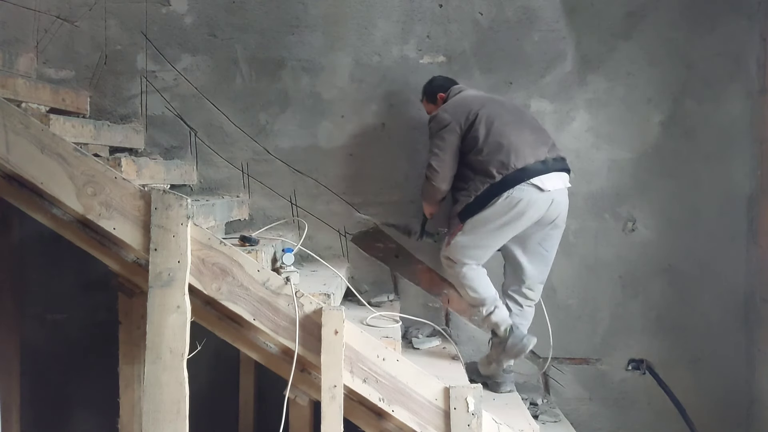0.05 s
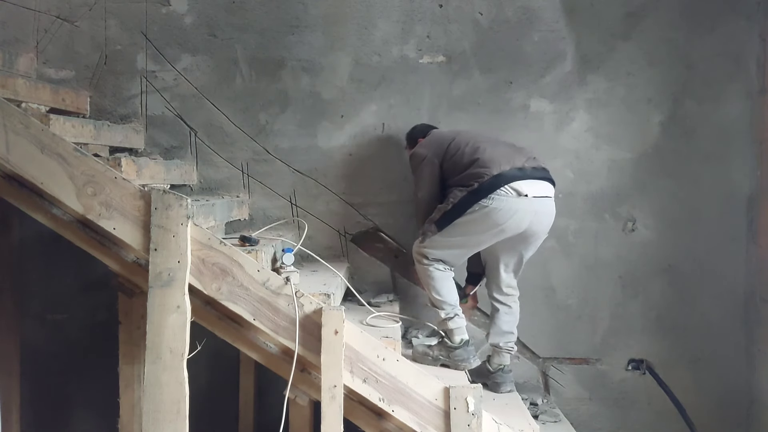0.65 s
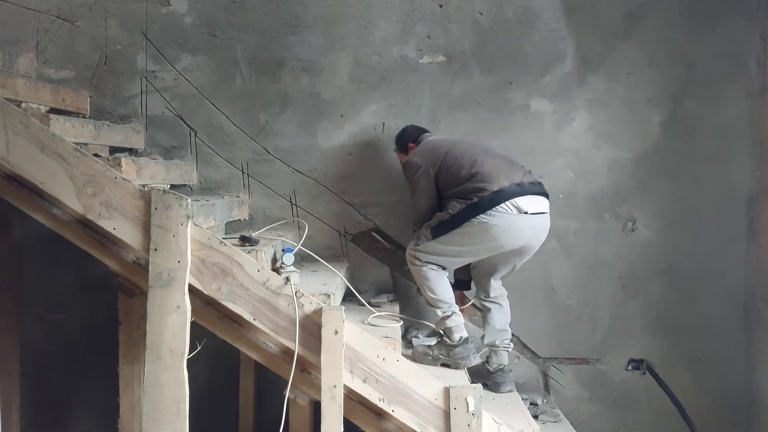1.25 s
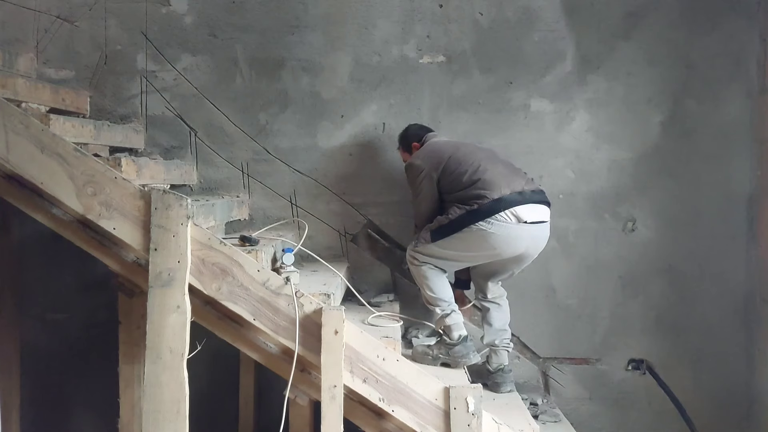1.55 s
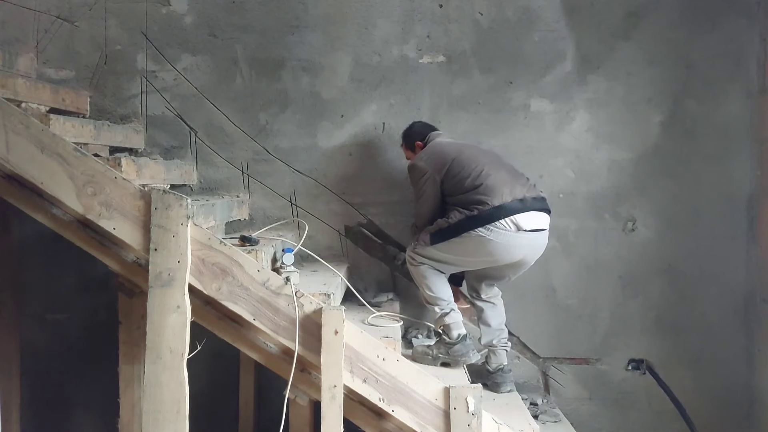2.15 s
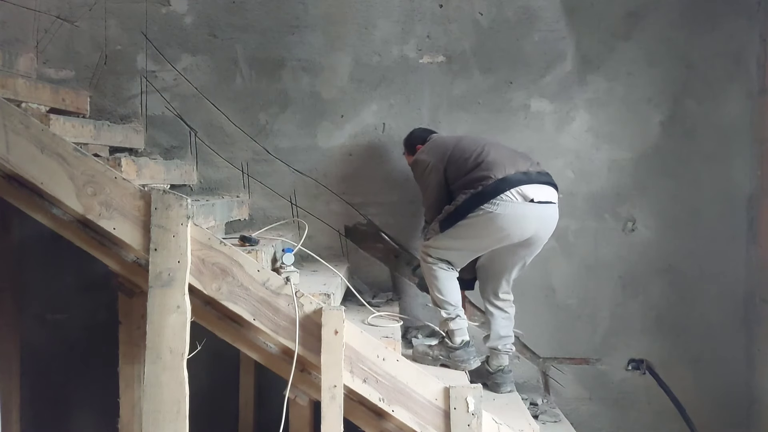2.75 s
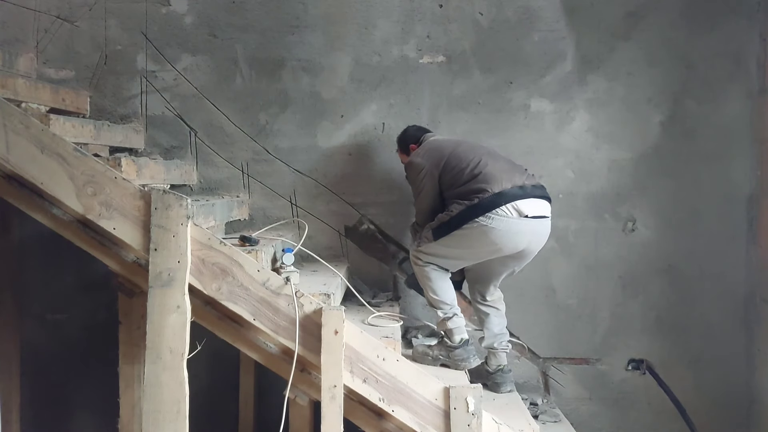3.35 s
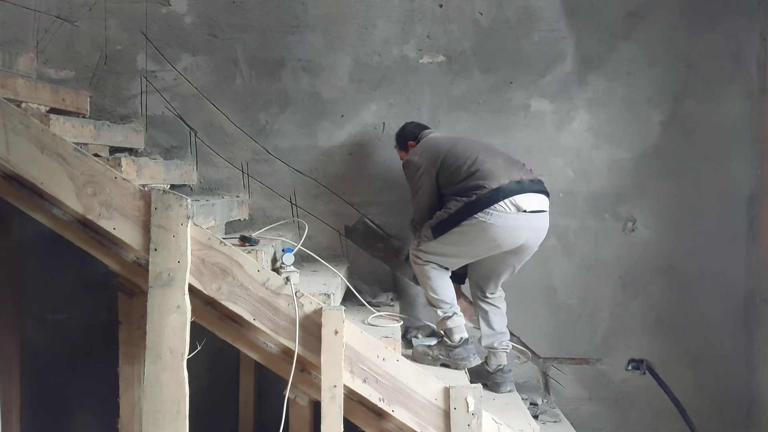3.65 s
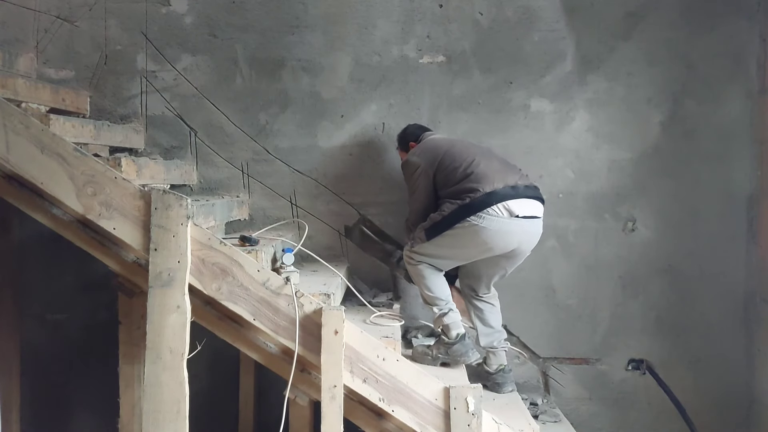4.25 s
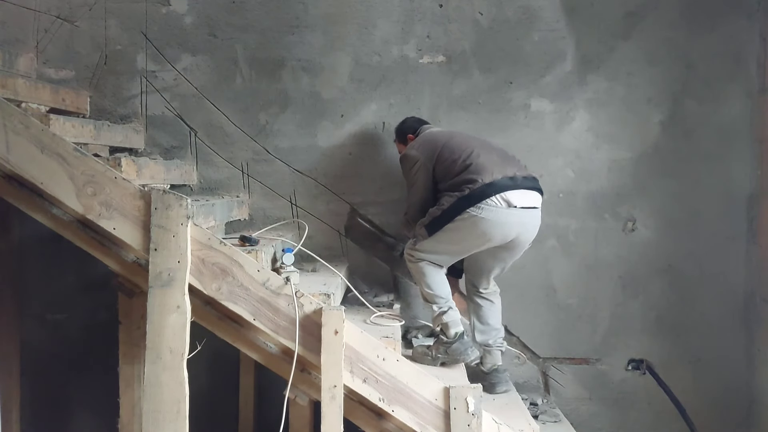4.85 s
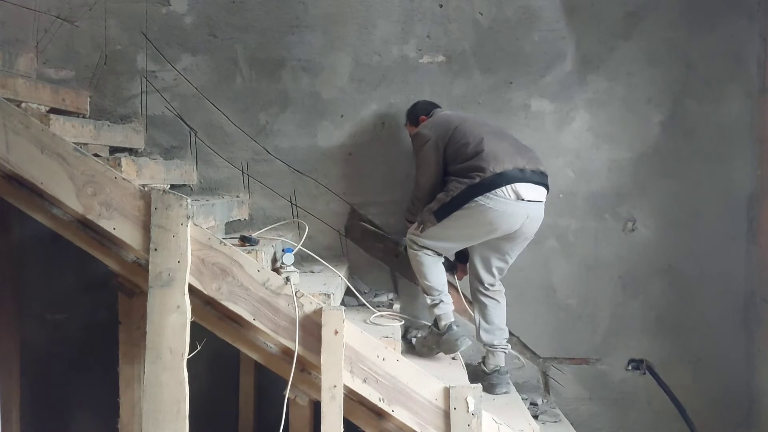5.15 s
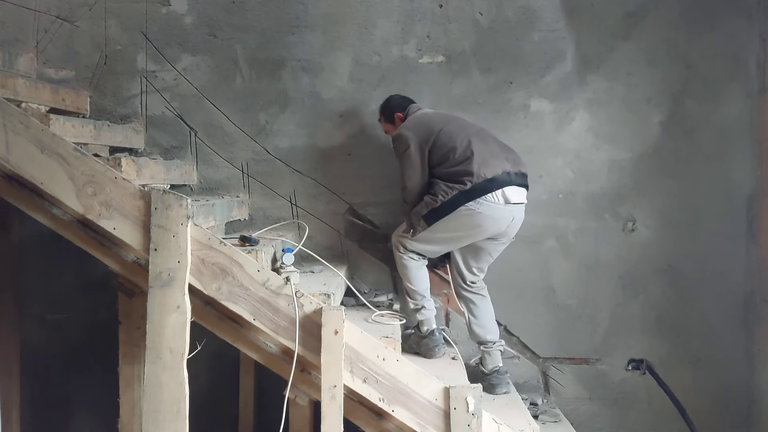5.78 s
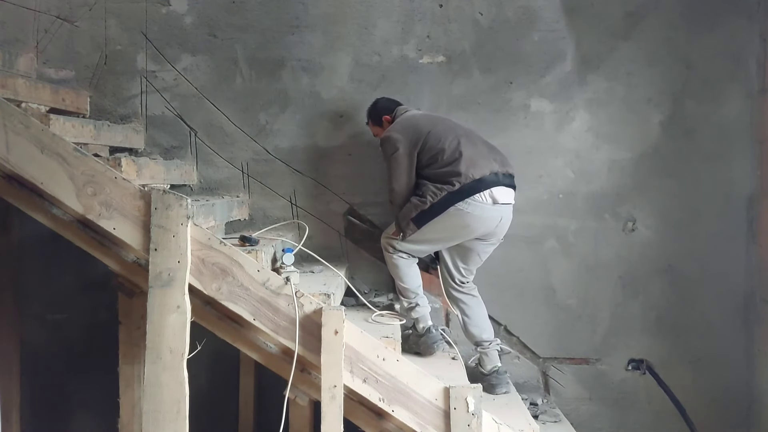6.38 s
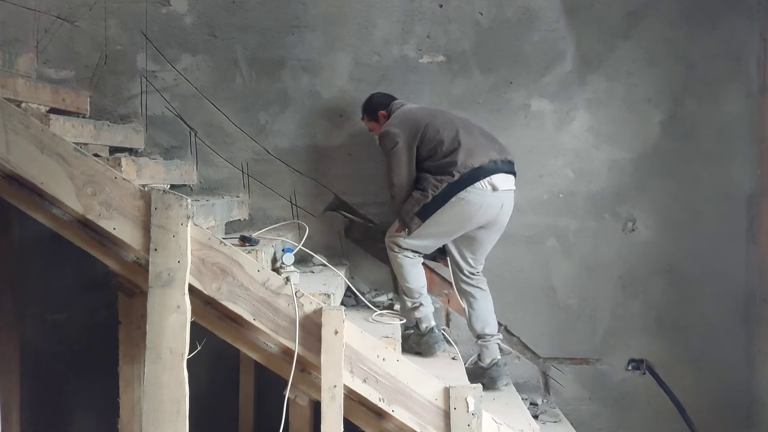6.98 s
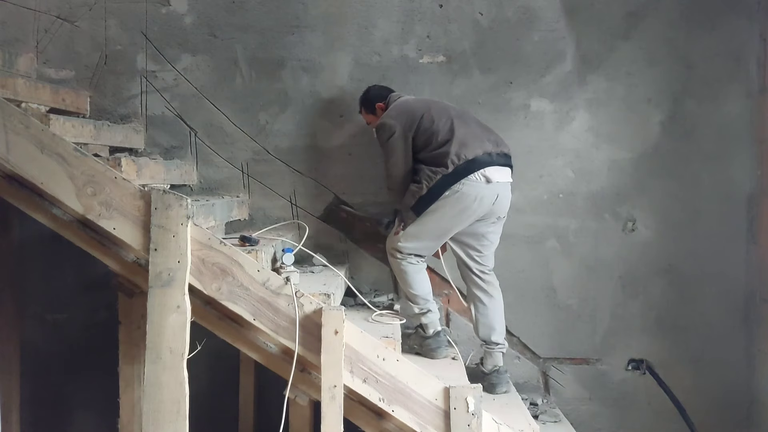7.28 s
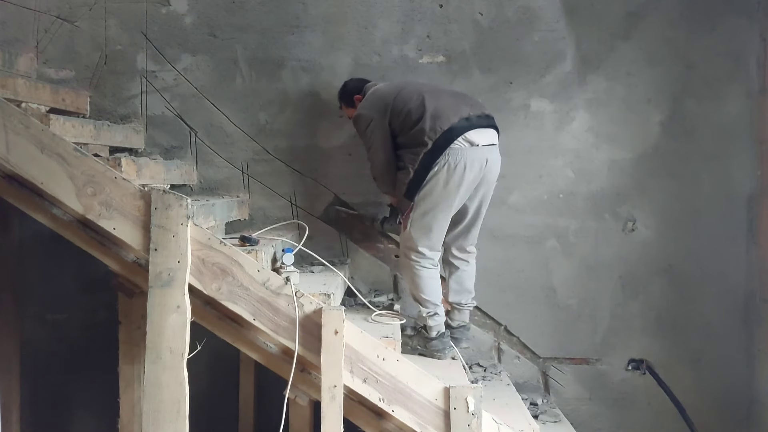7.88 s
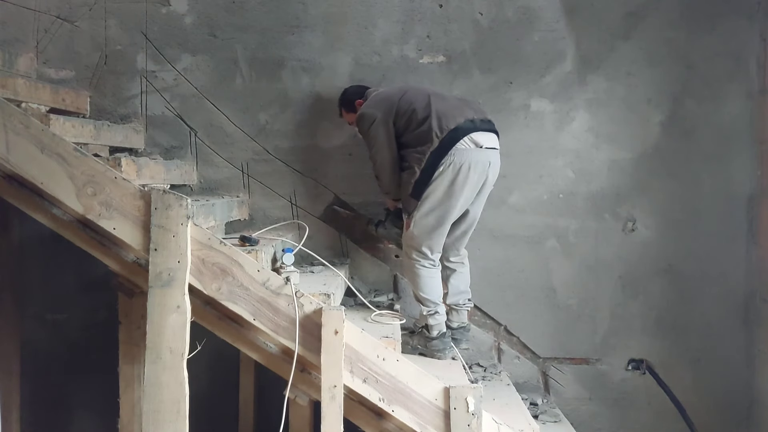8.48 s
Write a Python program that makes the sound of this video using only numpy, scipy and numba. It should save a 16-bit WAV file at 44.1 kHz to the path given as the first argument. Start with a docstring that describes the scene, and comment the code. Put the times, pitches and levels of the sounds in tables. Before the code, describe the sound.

A power hammer chips at a concrete wall in stop-start runs, with piercing steel ringing, crunching grit and a running motor.

```python
"""Demolition hammer on concrete

An electric hammer chisels a channel into a wall in a bare stairwell. Its motor runs throughout, and a
plank groans at the start. While the tool is pressed on, about 45 impacts a second excite the shrill
modes of the steel chisel and crush the concrete. A fast limiter flattens the ring and pushes all the
other sounds down under it."""
import sys
import numpy as np
from scipy import signal
from scipy.fft import rfft, irfft
from scipy.io import wavfile
from scipy.ndimage import uniform_filter1d
from numba import njit

SR = 44100
rng = np.random.default_rng(int(sys.argv[2]) if len(sys.argv) > 2 else 0)


def transcribe(signal):
    """Save signal, clipped to [-1, 1], as a 16-bit WAV file at the path in sys.argv[1]."""
    frames = np.atleast_2d(signal).T
    limited = np.clip(frames, -1, 1)
    pcm = np.round(limited * 32767).astype(np.int16)
    wavfile.write(sys.argv[1], SR, pcm)


N = 375732
TIME = np.arange(N) / SR

# Levels in the tables are relative; spectra give only a shape.
# Idling motor: t/s, level/dB
MOTOR_LEVEL = [(0, -30.5), (.5, -29), (.85, -23), (1.2, -34.5), (4, -33.5), (8.52, -34)]
# Armature, gear and fan tones: multiple of armature speed, level/dB
MOTOR_ORDERS = [(1, -24.5), (6, -20), (12, -17), (18, -21), (24, -17.5)]
# Spectrum of cooling air and gear noise: f/Hz, level/dB
AIR_SPECTRUM = [(22, -60), (45, -39), (100, -10), (250, -6), (480, 5), (800, 3), (1150, 0), (1750, 8.5),
                (2200, 1.5), (3250, 4), (4100, 1.5), (5900, 5.5), (6800, -1.5), (7750, 3), (9500, -1.5),
                (15500, -5)]
# Spectrum of concrete being crushed: f/Hz, level/dB
CRUNCH_SPECTRUM = [(120, -17), (250, -6), (350, -2), (430, 1.5), (850, -3), (1250, -4.5), (1700, -9.5),
                   (2050, -9.5), (2600, -14), (3250, -15), (5200, -9.5), (12000, -27)]
# Spectrum of the wall's dull response: f/Hz, level/dB
THUD_SPECTRUM = [(30, -70), (50, -8), (85, 2), (135, 3), (200, -1.5), (320, -6.5), (700, -29)]
# Spectrum of steel striking steel: f/Hz, level/dB
CLATTER_SPECTRUM = [(1500, -42), (4000, -36), (6800, 3), (8500, 12.5), (10500, 12), (12500, 7.5),
                    (14800, -3), (16000, 9.5)]
# Hollow resonances of the groove: f/Hz, bandwidth/Hz, level/dB
GROOVE_RESONANCES = [(410, 60, -10), (560, 41, -9), (840, 95, -16), (1167, 115, -12.5)]
# Quickly damped modes of the chisel: f/Hz, bandwidth/Hz, level/dB
STEEL_MODES = [(4543, 250, -22.5), (6085, 160, -21.5), (7700, 150, -4.5), (9050, 720, -6), (9447, 65, 0.5),
               (11160, 140, -6.5), (14810, 220, -5.5)]
# The tool is pressed on: start/s, end/s, ring/dB, clatter/dB, thud/dB, bounce depth/dB
TOOL_PUSHES = [(0.8736, 2.4, -4.5, -14.5, -35.5, 3.5), (2.835, 3.706, -5, -12, -32.5, 3.5),
               (4.0816, 4.603, -5, -15, -36.5, 1.5), (4.658, 4.895, -4, -18, -42, 21),
               (5.235, 5.313, -10.5, -19, -38, 5.5), (5.365, 6.708, -4.5, -14.5, -35.5, 18.5),
               (6.841, 6.975, -23, -22.5, -29, 8), (7.3227, 7.704, -4, -17.5, -43, 25),
               (7.766, 8.515, -4, -14.5, -35.5, 24)]
# How hard the tip bites, one curve per stretch of work: t/s, level/dB
BITE_CURVES = [
    [(0.87, -30), (1.038, -26.5), (1.188, -52), (1.39, -22), (1.5, -20), (1.586, -34.5), (1.7, -21),
     (1.778, -19.5), (1.818, -30.5), (2.26, -30), (2.42, -44.5)],
    [(2.83, -32.5), (2.94, -29.5), (3.256, -45.5), (3.328, -29.5), (3.436, -39.5), (3.452, -63),
     (3.536, -36.5), (3.728, -44.5)],
    [(4.08, -37), (4.096, -49.5), (4.24, -55), (4.324, -28.5), (4.4, -46), (4.66, -36), (4.688, -70),
     (4.868, -52.5), (4.92, -47.5)],
    [(5.23, -41.5), (5.49, -50), (5.6, -30), (5.918, -73.5), (6.044, -35.5), (6.27, -25), (6.554, -25.5),
     (6.702, -39), (6.74, -44.5)],
    [(7.32, -31), (7.406, -57.5), (7.436, -46.5), (7.57, -61.5), (7.764, -55.5), (7.998, -69),
     (8.028, -49.5), (8.198, -30), (8.52, -17.5)],
]
# The shaft sings on hard stone: start/s, end/s, ring gain/dB, bending gain/dB
SINGING_SPELLS = [(.97, 1.28, 2, 15.5), (1.103, 1.22, 1.5, 14.5), (1.933, 2.15, -1.5, 15),
                  (2.39, 2.44, 3.5, 18), (3.033, 3.23, 4, 12.5), (3.402, 3.8, -0.5, 11.5),
                  (4.123, 4.4, 2.5, 19.5), (4.263, 4.483, -1, 10), (4.765, 4.868, 8, 15),
                  (5.277, 5.26, 24, 27), (5.713, 5.842, 8, 21.5), (5.86, 5.76, 6, 2),
                  (7.476, 7.677, 4, 16.5), (7.958, 7.97, 6.5, 14.5), (8.065, 8.2, 1, 15.5)]
# The tip skids and the ring breaks off: centre/s, duration/s, ring loss/dB
TIP_SKIDS = [(1.305, 0.064, 27), (1.87, 0.11, 10.5), (2.27, 0.17, 11.5), (6.017, 0.0088, 24),
             (6.509, 0.26, 9), (8.038, 0.054, 15), (8.52, 0.042, 14)]
# The tip hops and each blow rings on its own: centre/s, duration/s, freely ringing share of a stroke
TIP_HOPS = [(1.605, 0.22, 0.55), (6.445, 0.26, 0.35)]
# The tip shifts in loose rubble: centre/s, duration/s, crunch/dB, thud/dB
RUBBLE_SHIFTS = [(0.773, 0.16, -37.5, -41), (2.48, 0.35, -38.5, -63), (4.662, 0.099, -41, -38),
                 (6.33, 0.55, -45, -30), (6.842, 0.21, -36, -44), (7.012, 0.039, -27.5, -26.5),
                 (7.17, 0.51, -46, -69), (7.453, .05, -32.5, -36), (7.783, 0.17, -41.5, -44)]
# The wedged tip drones: centre/s, duration/s, f/Hz, level/dB
WEDGED_DRONES = [(1.423, 0.17, 405, -23), (6.352, 0.45, 300, -26.5), (6.42, 0.27, 450, -25),
                 (6.457, 0.34, 533, -27), (6.425, 0.39, 625, -24.5), (6.437, 0.23, 816, -24.5),
                 (8.188, 0.068, 526, -24), (8.474, 0.6, 532, -20)]
# Short scrapes, grit hiss and hollow grinding tones: centre/s, duration/s, f/Hz, bandwidth/Hz, level/dB
GRINDING_SWELLS = [(0.312, 0.067, 3060, 260, -28), (0.8, 0.071, 1740, 260, -31),
                   (3.066, 0.34, 350, 157, -27.5), (4.307, 0.15, 4140, 610, -25.5),
                   (5.017, 0.15, 1691, 219, -34), (5.236, 0.11, 3330, 230, -24),
                   (5.331, 0.27, 5080, 600, -30), (5.352, 0.14, 3320, 260, -28.5),
                   (6.397, 0.36, 755, 300, -23.5), (6.403, 0.65, 2010, 263, -30),
                   (6.524, 0.36, 3340, 240, -23), (6.953, 0.22, 3275, 201, -26),
                   (6.992, 0.24, 1960, 240, -31), (6.993, 0.1, 4720, 298, -29),
                   (7.038, 0.083, 840, 170, -30)]
# Lone hard blows, and one chunk of concrete cracking off at 7.005 s: t/s, f/Hz, level/dB
LONE_BLOWS = [(0.846, 8550, -9.5), (4.528, 7700, -7), (4.637, 9540, -2), (6.862, 8140, -9),
              (6.904, 8500, -4), (6.926, 7750, -2), (6.953, 7750, -8), (7.005, 4650, -16),
              (7.634, 13000, -9), (7.659, 12500, -3), (7.682, 12500, -8), (7.743, 9600, -7)]
# One chisel mode flares up and buzzes: centre/s, duration/s, f/Hz, level/dB
MODE_BUZZES = [(1.035, 0.12, 6100, -21.5), (1.65, 0.6, 6130, -24.5), (1.51, 0.25, 4580, -28),
               (2.126, 0.41, 4550, -27.5), (1.98, 0.71, 3170, -37), (3.06, 0.48, 6100, -28.5),
               (4.12, 0.12, 6250, -31.5), (5.61, 0.15, 5970, -24), (5.6, 0.13, 4570, -27),
               (6.33, 0.64, 6060, -28), (6.291, 0.44, 4560, -32), (8.55, 0.65, 4590, -24)]
# A whistle swells under the loudest ring: centre/s, duration/s, level/dB
WHISTLE_SWELLS = [(1.163, 0.15, -26), (4.81, 0.14, -33.5), (5.897, 0.15, -24), (7.621, 0.13, -26),
                  (7.979, 0.054, -25)]

BLOWS_PER_S, TURNS_PER_BLOW = 44.66, 5.782  # piston rate and armature gearing
RING_HZ, BEND_HZ = 9341, 1515.5  # main and bending modes of the shaft
CRUNCH_DB, BEND_DB = -30.5, -39  # base levels of crushed concrete and bending mode
RELEASE_DB_PER_S, CRUMBLE_DB_PER_S = 500, 196  # decay of steel and concrete after a push
LANDING = 0.84  # share of the stroke at which the tip lands


def from_db(db):
    """Amplitude ratio of a level in decibels."""
    return 10 ** (np.asarray(db) / 20)


def summed_db(*levels):
    """Incoherent addition: the powers of independent sounds add."""
    return 10 * np.log10(sum(from_db(db) ** 2 for db in levels))


def unit_rms(x):
    """Normalisation to unit mean power."""
    return x / np.sqrt(np.mean(x ** 2) + 1e-20)


def evened(x, span_s):
    """Division by the running RMS holds the power near one and keeps faster detail."""
    size = max(int(span_s * SR), 2)
    power = uniform_filter1d(uniform_filter1d(x ** 2, size), size)
    return x / np.sqrt(np.abs(power) + 1e-6 * np.mean(x ** 2))


def curve(points):
    """Linear interpolation of (t, value) points over the scene."""
    return np.interp(TIME, *np.transpose(points))


def swell(centre_s, span_s):
    """Gaussian envelope of height one."""
    return np.exp(-(2 * (TIME - centre_s) / span_s) ** 2)


def drift(per_s):
    """Random fluctuation of unit RMS, interpolated between per_s values a second."""
    knots = rng.standard_normal(int(per_s * N / SR) + 2)
    return unit_rms(np.interp(TIME * per_s, np.arange(len(knots)), knots))


def coloured(x, spectrum):
    """Spectral shaping by multiplication in the frequency domain; unit power."""
    hz, db = np.transpose(spectrum)
    bins_hz = np.maximum(np.fft.rfftfreq(N, 1 / SR), 1)
    gain = from_db(np.interp(np.log(bins_hz), np.log(hz), db))
    return unit_rms(irfft(rfft(x) * gain, N))


def noise(spectrum):
    """Stationary Gaussian noise of a given spectral shape."""
    return coloured(rng.standard_normal(N), spectrum)


def decaying(clicks, decay_s):
    """Exponential relaxation after each impulse."""
    return signal.lfilter([1], [1, -np.exp(-1 / (decay_s * SR))], clicks + 1e-18)


def resonance(x, hz, width_hz):
    """Two-pole resonator of unit peak gain."""
    radius = np.exp(-np.pi * width_hz / SR)
    feedback = [1, -2 * radius * np.cos(2 * np.pi * hz / SR), radius ** 2]
    return signal.lfilter(np.array([1, 0, -1]) * (1 - radius ** 2) / 2, feedback, x)


def steep_resonance(x, hz, width_hz, widen=2):
    """Resonators in cascade: a second, wider one steepens the skirts."""
    return resonance(resonance(x, hz, width_hz), hz, widen * width_hz)


@njit
def damped_mode(force, poles):
    """Forced response of a damped oscillator with a time-varying pole."""
    out, state = np.zeros(len(force)), 0j
    for i in range(len(force)):
        state = state * poles[i] + force[i]
        out[i] = state.imag
    return out


def shifting_mode(force, hz, width_hz, sweep, flicker_db, per_s):
    """Changing contact modulates the frequency and strength of a mode; unit power."""
    mode_hz = hz * (1 + sweep * drift(per_s))
    poles = np.exp((-np.pi * width_hz + 2j * np.pi * mode_hz) / SR)
    response = resonance(damped_mode(force, poles), hz, hz / 8)
    return unit_rms(response * from_db(flicker_db * drift(per_s)))


def blows(cycles, jitter_s, spread_db):
    """Impulse train: one click per piston stroke, scattered in time and strength."""
    onsets = np.flatnonzero(np.diff(np.floor(cycles)))
    timing, strength = rng.standard_normal((len(onsets), 2)).T
    onsets += (timing * jitter_s * SR).astype(int)
    clicks = np.zeros(N)
    clicks[np.clip(onsets, 0, N - 1)] = from_db(spread_db * strength)
    return clicks


def stairwell(x, t60_s):
    """Diffuse reflections from bare concrete: convolution with exponentially decaying noise."""
    tail = rng.standard_normal(SR) * from_db(-60 * TIME[:SR] / t60_s)
    return signal.fftconvolve(x, tail / np.sqrt(np.sum(tail ** 2)))[:N]


def board_groan(start_hz=180, end_hz=152, groan_db=-28):
    """Friction under a shifting foot makes a plank vibrate briefly, sinking in pitch."""
    hz = np.interp(TIME, [0, .15], [start_hz, end_hz])
    strain = np.interp(TIME, [0, .04, .08, .13, .152], [0.0, 0.81, 0.39, 1.3, 0.018])
    return from_db(groan_db) * strain * np.sin(2 * np.pi * np.cumsum(hz) / SR)


def motor(throb=0.19, wobble=0.00138, flutter_db=3):
    """Rotation gives harmonics of the armature speed; the piston modulates the fan's air noise."""
    cycles = TIME * BLOWS_PER_S
    turns = TURNS_PER_BLOW * (cycles + np.cumsum(wobble * drift(30)) * BLOWS_PER_S / SR)
    tones = sum(from_db(db + flutter_db * drift(11)) * np.sin(2 * np.pi * order * turns)
                for order, db in MOTOR_ORDERS)
    air = noise(AIR_SPECTRUM) * (1 + throb * np.cos(2 * np.pi * (cycles - .15)))
    return from_db(curve(MOTOR_LEVEL)) * (air + np.sqrt(2) * tones)


def rubble_levels():
    """Contact with loose rubble: swelling levels of crunch and thud, in dB."""
    gains = sum(from_db([[crunch_db], [thud_db]]) * swell(t, span)
                for t, span, crunch_db, thud_db in RUBBLE_SHIFTS)
    return 20 * np.log10(gains + 1e-9)


def wall(cycles, crunch_db, thud_db, grit=0.99, boom=2.35, patchy_db=2.5):
    """Impact and fracture: knocks and sprays of crushed grit excite the wall and its groove."""
    strikes = blows(cycles, jitter_s=0.00006, spread_db=2.0)
    spray = unit_rms(decaying(strikes, 0.034) + 2.5) * from_db(patchy_db * drift(40))
    knocks = unit_rms(stairwell(strikes, t60_s=0.16))
    force = knocks + grit * spray * rng.standard_normal(N)
    groove = sum(from_db(db) * shifting_mode(force, hz, width, sweep=0.11, flicker_db=4.5, per_s=8)
                 for hz, width, db in GROOVE_RESONANCES)
    thud = unit_rms(coloured(knocks, THUD_SPECTRUM) + boom * spray * noise(THUD_SPECTRUM))
    crunch = coloured(force, CRUNCH_SPECTRUM) + groove
    return from_db(crunch_db) * crunch + from_db(thud_db) * thud


def drones(cycles, width_hz=45):
    """Periodic forcing: even blows on the wedged tip pump low resonances into a pitched rattle."""
    strikes = blows(cycles, jitter_s=0.00008, spread_db=1.5)
    return sum(from_db(db) * swell(t, span) * unit_rms(steep_resonance(strikes, hz, width_hz, widen=4))
               for t, span, hz, db in WEDGED_DRONES)


def grinding(strikes):
    """Band-pass filtered noise: scrapes, grit hiss and hollow tones, each swelling in one band."""
    rasp = (decaying(strikes, 0.014) + 0.39) * rng.standard_normal(N)
    return sum(from_db(db) * swell(t, span) * unit_rms(steep_resonance(rasp, hz, width))
               for t, span, hz, width, db in GRINDING_SWELLS)


def landing_offset(cycles):
    """Phase from the nearest landing of the tip, in strokes."""
    return (cycles - LANDING + .5) % 1 - .5


def landings(cycles, crunch_db, stroke_share=0.39, clank_hz=3150, width_hz=300):
    """Friction on the concrete late in each stroke excites a hollow clank that follows the crunch."""
    rub = np.exp(-(landing_offset(cycles) / stroke_share) ** 2)
    clank = steep_resonance(rub * rng.standard_normal(N), clank_hz, width_hz)
    clank_db = -38 + 0.7 * (crunch_db - CRUNCH_DB)
    return from_db(clank_db) * unit_rms(clank)


def buzzes(cycles, stroke_share=0.39, sag_hz=70, slip_rad=0.89, flicker_db=2.5):
    """Each landing excites a chisel mode in a falling chirp, roughened by phase modulation."""
    offset = landing_offset(cycles)
    burst = unit_rms(np.exp(-(2 * offset / stroke_share) ** 4))
    sag = sag_hz * offset ** 2 / stroke_share / 2
    shake = slip_rad * drift(330)
    envelope = np.sqrt(2) * burst * from_db(flicker_db * drift(70))
    chirps = np.zeros(N)
    for t, span, hz, db in MODE_BUZZES:
        phase = 2 * np.pi * (hz * offset - sag) / BLOWS_PER_S + shake
        chirps += from_db(db) * swell(t, span) * np.sin(phase)
    return envelope * chirps


def hard_blows(decay_s=0.0034, width_hz=900):
    """Impact transients: the striker catches the loose chisel with single sharp clacks, and one lower crack
    near 4.7 kHz marks a chunk of concrete breaking off."""
    clacks = np.zeros(N)
    for t, hz, db in LONE_BLOWS:
        click = np.zeros(N)
        click[int(t * SR)] = from_db(db)
        band = evened(resonance(rng.standard_normal(N), hz, width_hz), 0.0023)
        clacks += resonance(decaying(click, decay_s) * band, hz, 2 * width_hz)
    return clacks


def whistles(strikes, hz=3990, width_hz=80):
    """A rough, narrow whistle near 4 kHz pulses with the blows and swells under the loudest ring."""
    rasp = (decaying(strikes, 0.013) + .5) * rng.standard_normal(N)
    tone = evened(steep_resonance(rasp, hz, width_hz, widen=3), 0.0075)
    return tone * sum(from_db(db) * swell(t, span) for t, span, db in WHISTLE_SWELLS)


def chisel_clatter(strikes, clatter_db, bend_db, hiss_db=-1):
    """Broadband excitation: each blow gives a burst of noise and drives jangling and bending modes."""
    pulses = unit_rms(decaying(decaying(strikes, 0.0032), 0.0014))
    hiss = from_db(hiss_db) * unit_rms(pulses + 1) * noise(CLATTER_SPECTRUM)
    contact = decaying(strikes, 0.0081) + 0.42
    jangle = np.zeros(N)
    for hz, width, db in STEEL_MODES:
        force = contact * rng.standard_normal(N)
        jangle += from_db(db) * shifting_mode(force, hz, width, sweep=0.0092, flicker_db=3.5, per_s=60)
    bend = evened(resonance(contact * rng.standard_normal(N), BEND_HZ, width_hz=28), 0.029)
    bend *= from_db(1.5 * drift(60))
    return from_db(clatter_db) * (hiss + jangle) + from_db(bend_db) * bend


def contact_damping(cycles, free_share, fall_share=0.3):
    """Damping rises from 0 to 1 as the tip meets the wall after the free share of a stroke."""
    return np.clip((cycles % 1 - free_share) / fall_share, 0, 1)


def bounce(cycles, depth_db, bounce_s=0.14, hop_depth_db=15):
    """Rebound damping in dB: later in each of a push's first strokes, and whenever the tip hops."""
    free_share = 0.25 + 0.75 * np.floor(cycles) / BLOWS_PER_S / bounce_s
    hops = sum(swell(t, span) * contact_damping(cycles, share) for t, span, share in TIP_HOPS)
    return depth_db * contact_damping(cycles, free_share) + hop_depth_db * hops


def chisel_ring(cycles, ring_db, clatter_db, bounce_db, choke_db=12, stroke_db=3.0, grit_db=4.5,
                wander_hz=20, rise_hz=260, flat_hz=250, chatters_per_s=160):
    """The shaft's main mode: each blow starts it flat; contact with the wall sharpens and damps it."""
    # contact is weak where the ring stands far above the clatter; it scales the irregularities
    pressed = 1 / (1.5 + np.exp((ring_db - clatter_db - 16.5) / 4))
    strikes = blows(cycles, jitter_s=0, spread_db=0)
    stroke = np.cumsum(strikes > 0)
    strength, timing = rng.standard_normal((stroke[-1] + 1, 2))[stroke].T
    choke = pressed * contact_damping(cycles, free_share=0.58 + 0.22 * timing)
    damping_db = np.maximum(choke_db * choke, bounce_db)
    just_struck = pressed * np.exp(-(cycles % 1) / 0.06)
    hz = RING_HZ + wander_hz * drift(25) + rise_hz * (damping_db / 20) ** 2 - flat_hz * just_struck
    # the blows, and the shank chattering in its holder, jolt the phase
    chatter = rng.random(N) < chatters_per_s * pressed / SR
    jolts_rad = (1.25 * strikes + 1.3 * chatter) * rng.standard_normal(N)
    phase = np.cumsum(2 * np.pi * hz / SR + jolts_rad)
    roughness_db = pressed * (1.5 + stroke_db * strength + grit_db * drift(200))
    ring = np.sqrt(2) * from_db(ring_db - damping_db + roughness_db) * np.sin(phase)
    return steep_resonance(ring, RING_HZ, width_hz=1200)


def latest_push():
    """Gating by the latest push: seconds since it began, seconds since it ended, its four levels."""
    pushes = np.array(TOOL_PUSHES)
    latest = np.maximum(np.searchsorted(pushes[:, 0], TIME, "right") - 1, 0)
    start, end, *levels = pushes[latest].T
    eased_s = np.where(TIME < start, 1, np.maximum(TIME - end, 0))
    return TIME - start, eased_s, levels


def singing(fade_s=0.039):
    """Hard stone under the tip strengthens the main and bending modes: two gains in dB."""
    ring_db = bend_db = np.zeros(N)
    for start, end, ring_gain_db, bend_gain_db in SINGING_SPELLS:
        spell = np.clip(1 + np.minimum(TIME - start, end - TIME) / fade_s, 0, 1)
        ring_db = np.maximum(ring_db, spell * ring_gain_db)
        bend_db = np.maximum(bend_db, spell * bend_gain_db)
    return ring_db, bend_db


def work_levels(since_s, eased_s, ring_db, clatter_db, thud_db, usual_bite_db=-35.5):
    """Energy partition, in dB: a deeper bite trades ring for clatter and crushed concrete."""
    bite_db = curve(np.concatenate(BITE_CURVES)) - usual_bite_db
    sing_db, flex_db = singing()
    skid_db = sum(db * swell(t, span) for t, span, db in TIP_SKIDS)
    hop_db = 6 * sum(swell(t, span) for t, span, _ in TIP_HOPS)  # the freed chisel rings louder
    attack_db = 7.5 * np.clip(1 - since_s / 0.0075, 0, 1)  # loss while the ring builds up
    settle_db = 11.5 * np.clip(1 - since_s / 0.1196, 0, 1)  # loss while the tip still bounces
    force_db = 0.5 * sing_db - settle_db
    steel_db = -RELEASE_DB_PER_S * eased_s
    concrete_db = force_db - CRUMBLE_DB_PER_S * eased_s
    ring = ring_db + steel_db + sing_db + hop_db - attack_db - skid_db - 0.15 * bite_db
    clatter = clatter_db + steel_db + force_db - 0.263 * skid_db + 0.23 * bite_db
    bend = BEND_DB + steel_db + flex_db - settle_db
    crunch = CRUNCH_DB + concrete_db + summed_db(bite_db, -19.5)  # even a light bite crushes grit
    thud = thud_db + concrete_db + 0.26 * bite_db + 0.27 * flex_db  # a bending shaft shakes the wall
    return ring, clatter, bend, crunch, thud


def scene(motor_load_db=-6.5, room_db=-15, room_t60_s=0.044):
    """Superposition: the piston's cycle drives chisel and wall over the running motor."""
    since_s, eased_s, (*push_levels, bounce_depth_db) = latest_push()
    ring_db, clatter_db, bend_db, crunch_db, thud_db = work_levels(since_s, eased_s, *push_levels)
    loose_crunch_db, loose_thud_db = rubble_levels()
    lead = 0.1 * np.clip(since_s / 0.3, 0, 1)  # under load the striker meets the chisel earlier
    cycles = since_s * BLOWS_PER_S + lead
    strikes = blows(cycles, jitter_s=0.00039, spread_db=5.0)
    bounce_db = bounce(cycles, bounce_depth_db)
    load = from_db(-CRUMBLE_DB_PER_S * eased_s)
    background = from_db(motor_load_db * load) * motor() + board_groan()
    concrete = wall(cycles, summed_db(crunch_db, loose_crunch_db), summed_db(thud_db, loose_thud_db))
    clatter = chisel_clatter(strikes, clatter_db - 0.095 * bounce_db, bend_db)
    accents = landings(cycles, crunch_db) + buzzes(cycles) + grinding(strikes) + hard_blows()
    impacts = concrete + drones(cycles) + clatter + accents
    reflections = from_db(room_db) * stairwell(impacts, room_t60_s)
    ring = chisel_ring(cycles, ring_db, clatter_db, bounce_db) + whistles(strikes)
    return (background + reflections + impacts + ring)[None]


def record(dry, rate_hz=32000, limit_db=-8.5, follow_s=0.0048, ceiling=0.9, cutoff_hz=15650):
    """Dynamic compression: a fast look-ahead limiter, then soft clipping and a steep low-pass."""
    x = signal.resample_poly(dry, rate_hz, SR, axis=1, window=("kaiser", 2))
    ahead = np.roll(x, -int(0.00058 * rate_hz), axis=1)
    pole = np.exp(-1 / (follow_s * rate_hz))
    relative_power = signal.lfilter([1 - pole], [1, -pole], ahead ** 2) / from_db(limit_db) ** 2
    limited = x / (1 + relative_power ** 2) ** (1 / 4)
    rounded = limited / (1 + (limited / ceiling) ** 6) ** (1 / 6)
    x = signal.resample(rounded, round(rounded.shape[1] * SR / rate_hz), axis=1)[:, :N]
    x = np.pad(x, [(0, 0), (0, N - x.shape[1])])
    return signal.sosfilt(signal.ellip(12, .1, 90, cutoff_hz, fs=SR, output="sos"), x)


dry = scene()
out = record(dry)
transcribe(out)
```